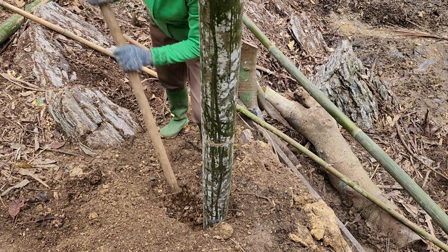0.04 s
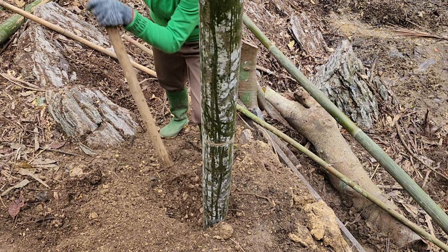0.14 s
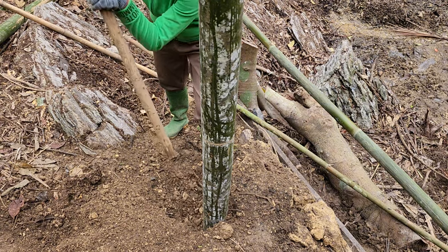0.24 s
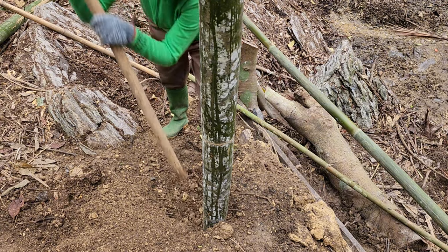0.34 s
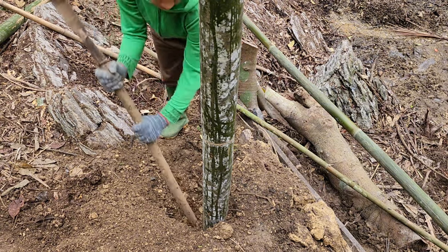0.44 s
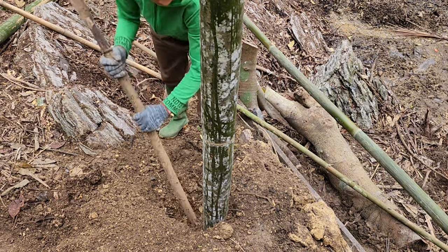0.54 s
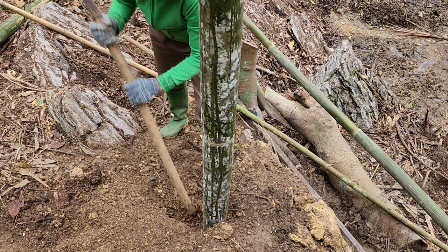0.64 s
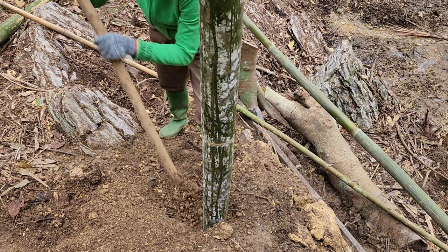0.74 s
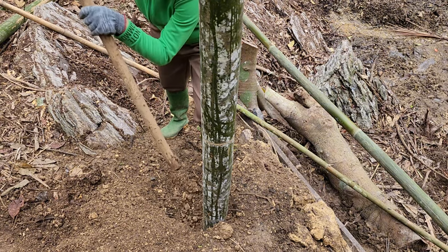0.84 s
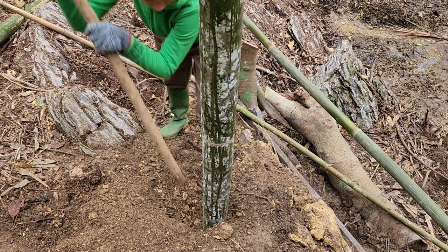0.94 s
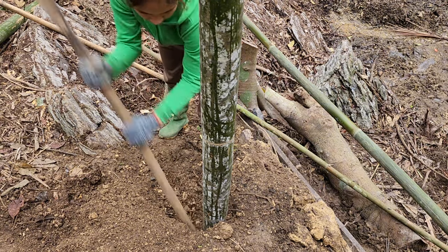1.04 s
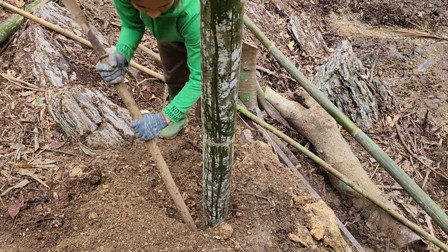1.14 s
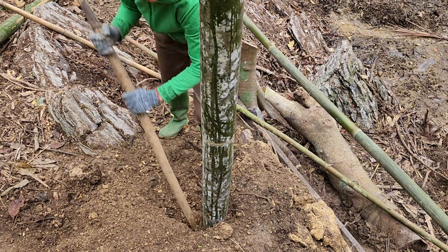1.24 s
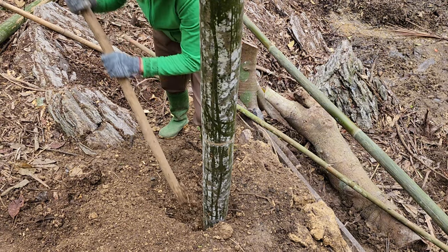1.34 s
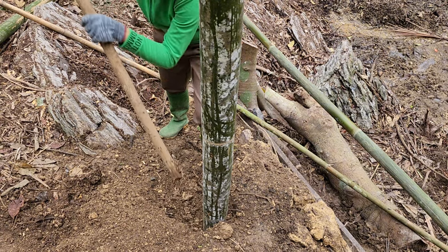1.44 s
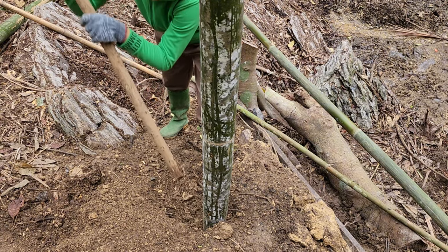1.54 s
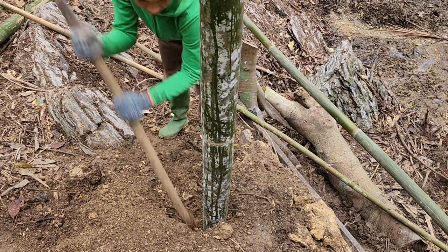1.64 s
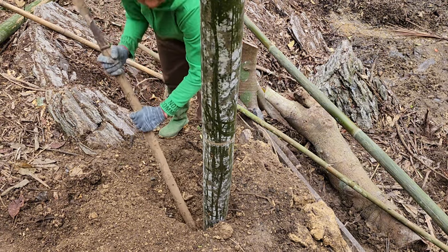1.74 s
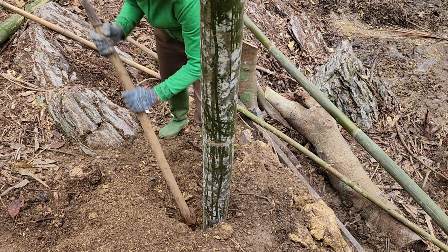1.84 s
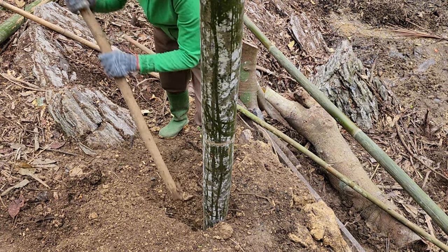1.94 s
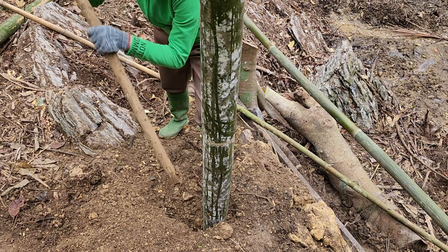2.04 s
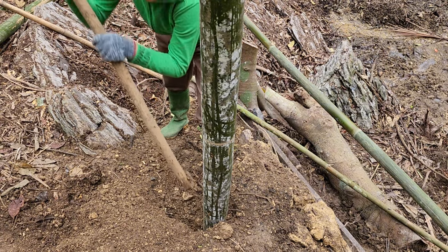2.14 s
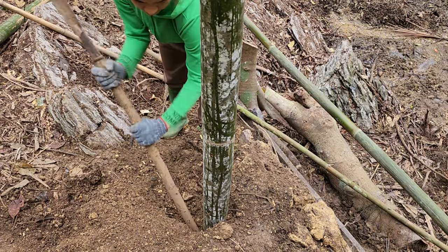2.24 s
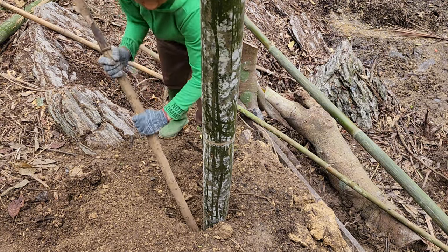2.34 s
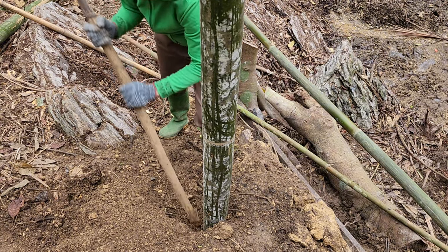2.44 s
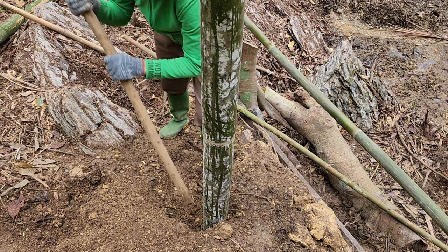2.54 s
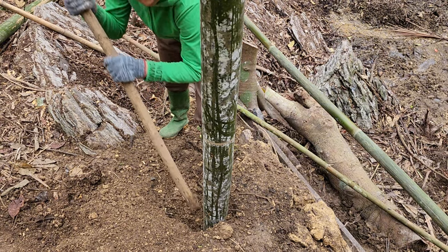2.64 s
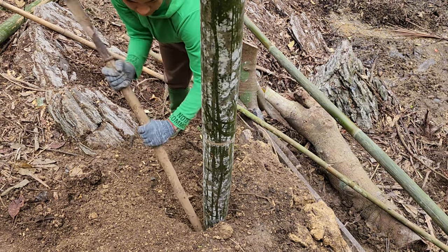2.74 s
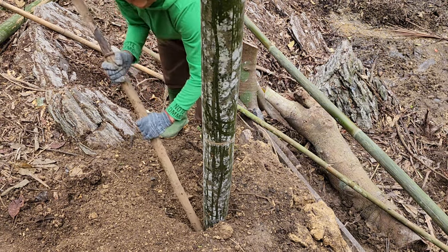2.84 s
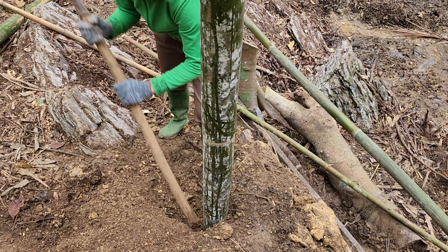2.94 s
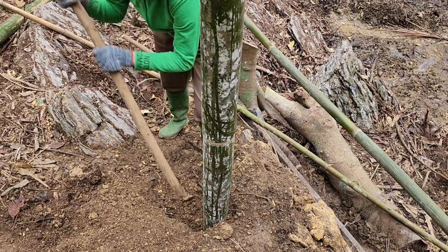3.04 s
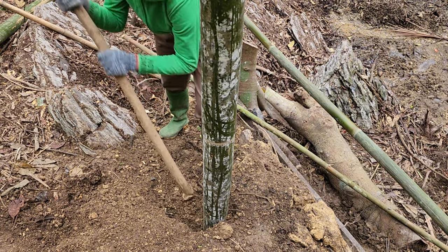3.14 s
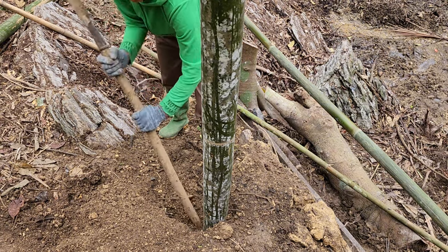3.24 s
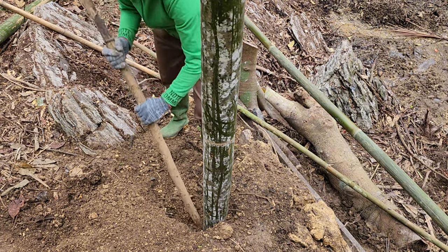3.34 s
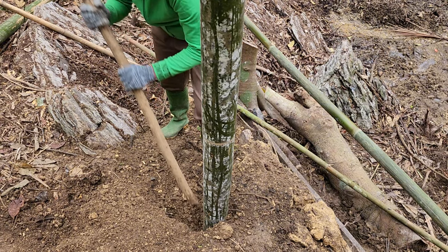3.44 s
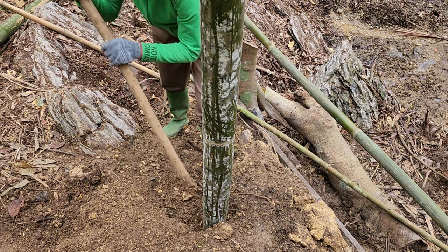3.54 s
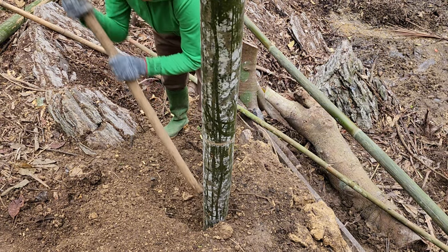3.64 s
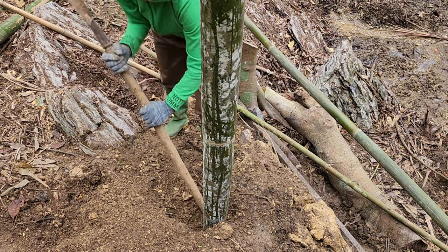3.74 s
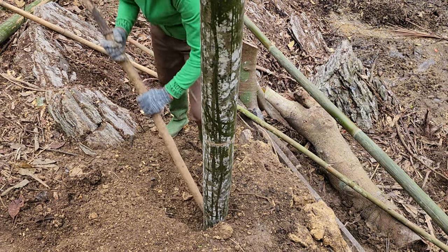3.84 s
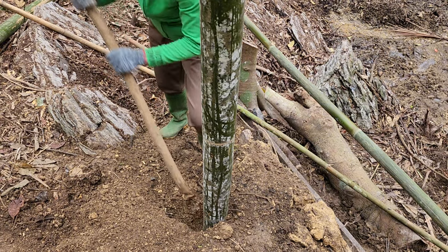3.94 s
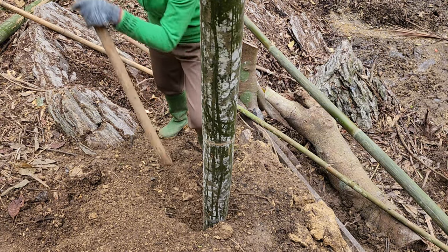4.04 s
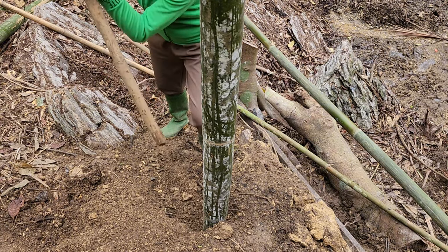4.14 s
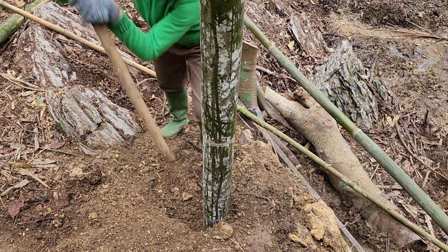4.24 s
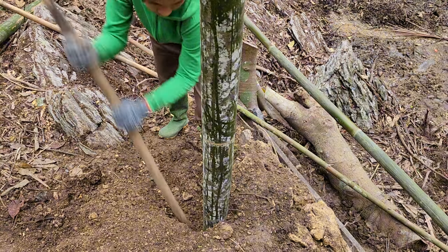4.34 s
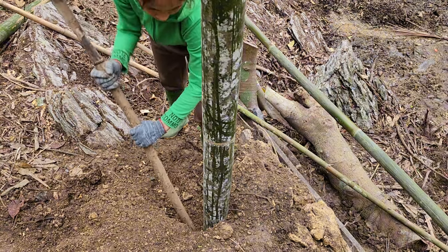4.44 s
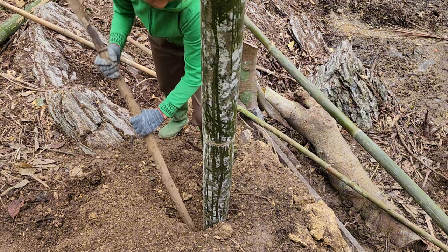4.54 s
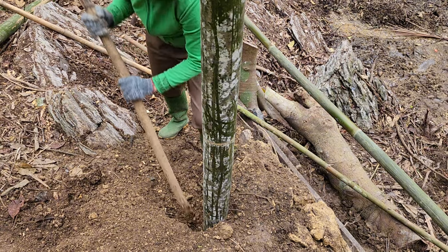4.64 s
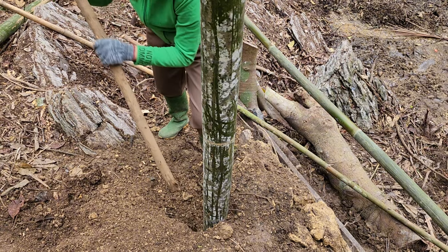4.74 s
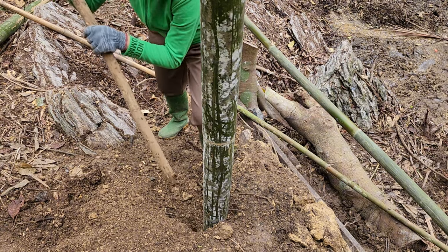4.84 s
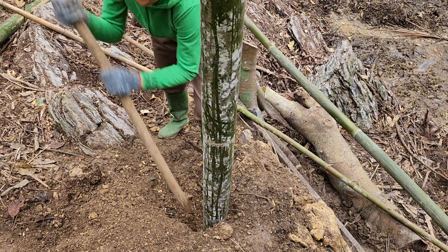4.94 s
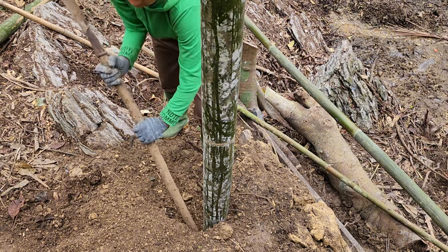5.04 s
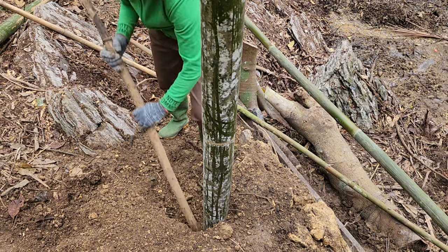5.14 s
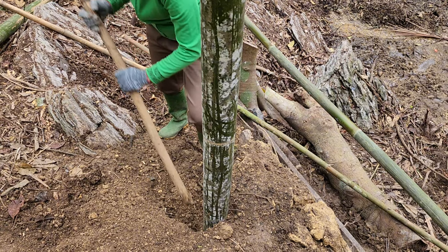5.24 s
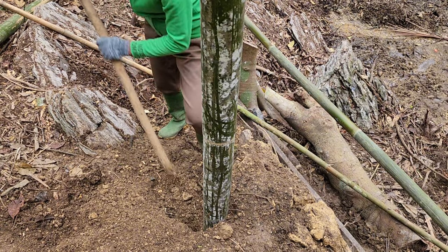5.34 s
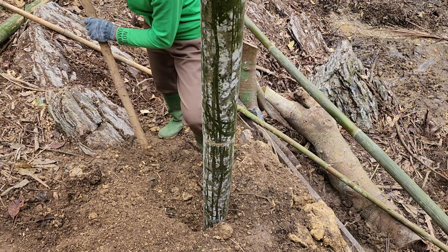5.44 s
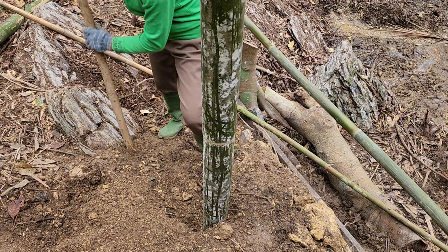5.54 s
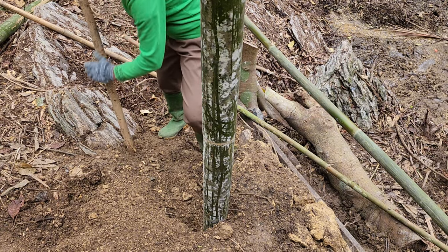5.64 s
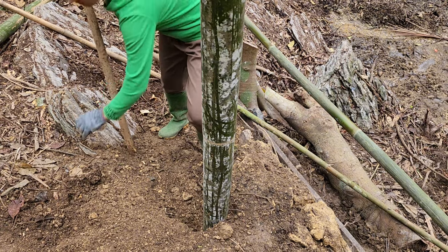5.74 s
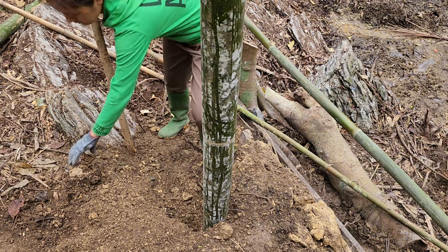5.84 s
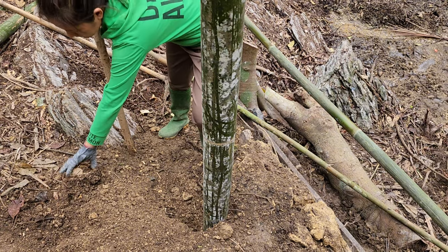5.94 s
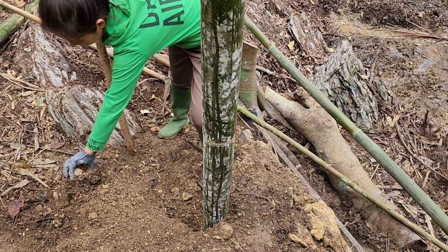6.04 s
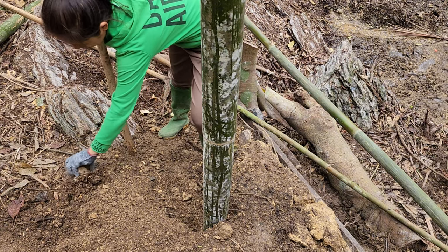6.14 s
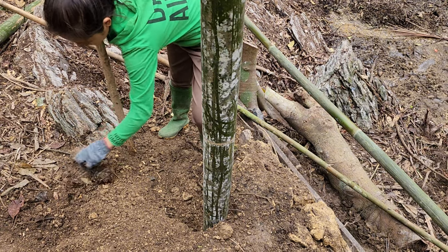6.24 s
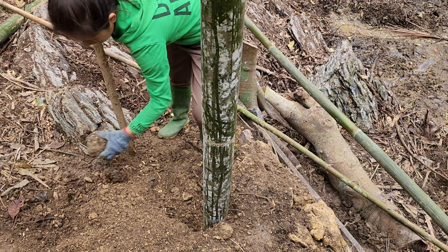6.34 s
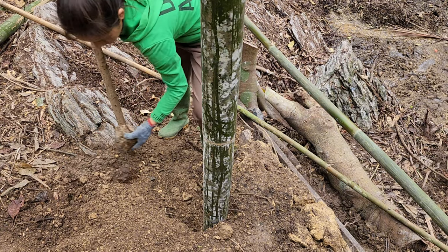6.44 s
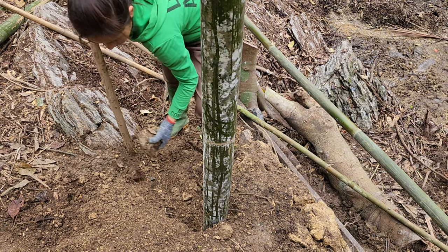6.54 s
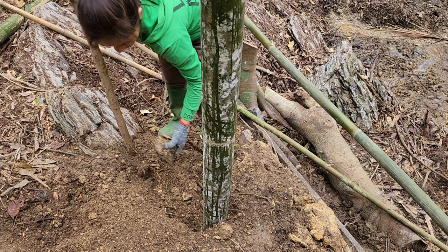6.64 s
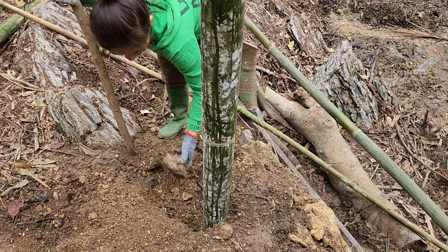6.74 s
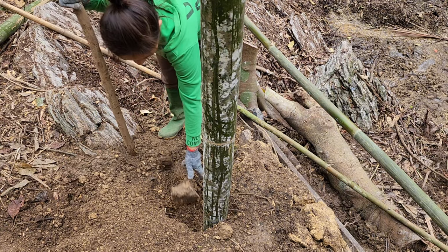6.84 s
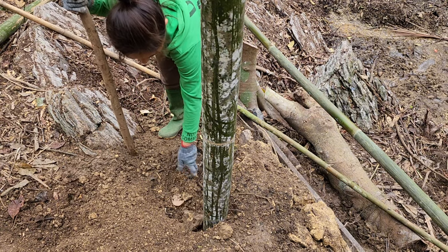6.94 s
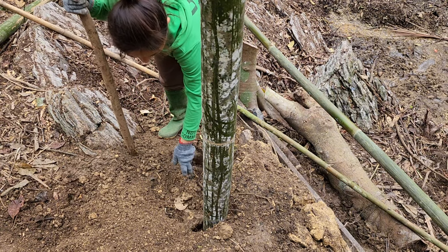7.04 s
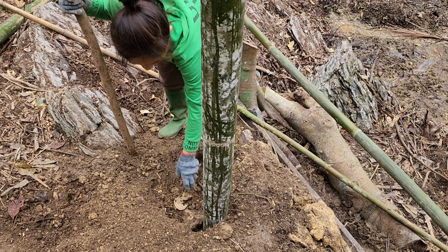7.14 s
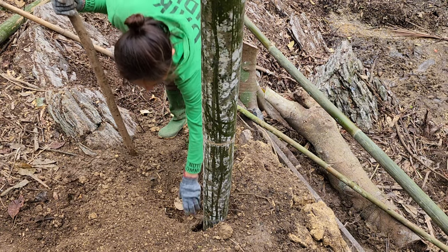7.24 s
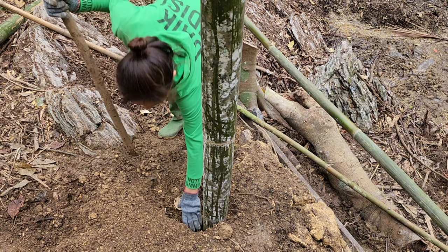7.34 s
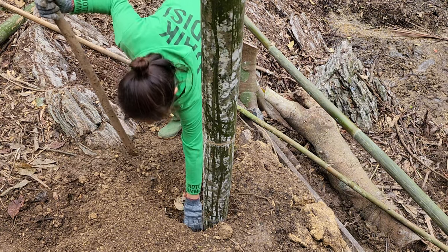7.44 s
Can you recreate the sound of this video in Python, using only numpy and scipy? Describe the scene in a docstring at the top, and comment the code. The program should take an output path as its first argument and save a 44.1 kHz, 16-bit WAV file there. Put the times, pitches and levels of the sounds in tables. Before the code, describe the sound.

A wooden pole is rammed repeatedly into loose soil with close, crunching thuds, while insects chirr faintly outdoors.

```python
"""Crunching, thumping blows close by: a wooden pole is rammed into loose soil beside a post, near a phone.
Later the pole is set down and a stone is dropped. Each blow crushes crumbs of earth, knocks the pole and
thumps the ground, which shudders on; soil trickles as the pole is pulled out.
Insects chirr over a distant outdoor rush."""
import sys
import numpy as np
from scipy import signal
from scipy.fft import rfft, irfft
from scipy.io import wavfile
from scipy.ndimage import uniform_filter1d

SR = 44100
rng = np.random.default_rng(int(sys.argv[2]) if len(sys.argv) > 2 else 0)


def materialize(psi):
    """Save the field psi as 16-bit PCM at rate SR to the path in sys.argv[1].

    A 1-D psi becomes a single channel; in a 2-D psi each row is a channel.
    """
    bounded = np.clip(np.atleast_2d(psi).T, -1, 1)
    quanta = np.round(bounded * 32767).astype(np.int16)
    wavfile.write(sys.argv[1], SR, quanta)


N = 330750

# modes of the wooden pole: f/Hz, gain/dB, t60/s
POLE_MODES = [(181, -37.5, 0.051), (290.6, -2.5, 0.11), (423.5, -3, 0.061), (637, -14.5, 0.11),
              (730, 5.5, 0.026), (868, 1, 0.025), (1104, -9, 0.016), (1290, -7, .03), (2300, -8, 0.028),
              (2600, -10, 0.035), (3130, -12, 0.014), (3680, 3, .025)]


def undb(db):
    """dB to gain."""
    return 10 ** (np.asarray(db) / 20)


def unit(x):
    """Scale to rms 1."""
    return x / np.sqrt(np.mean(x ** 2))


def band(x, hz, *widths_hz):
    """Two-pole band-passes in series, one per width; gain 1 at the centre."""
    for width_hz in widths_hz:
        x = signal.lfilter(*signal.iirpeak(hz, hz / width_hz, SR), x)
    return x


def walk(rate_hz):
    """Random levels, each held one period, smoothed twice."""
    hold = int(SR / rate_hz)
    steps = np.repeat(rng.standard_normal(N // hold + 1), hold)
    return uniform_filter1d(uniform_filter1d(steps, hold), hold)[:N]


def add(out, start_s, sound):
    """Mix sound into out at start_s."""
    i = int(start_s * SR)
    out[..., i:i + sound.shape[-1]] += sound[..., :N - i]


def clicks(size, scatter_db):
    """Dense clicks, a few much larger than the rest."""
    return unit(rng.standard_normal(size) * undb(scatter_db * np.minimum(rng.exponential(size=size), 5)))


def ports(right, left, lag_samples=6):
    """The ports face different ways: the left hears the hole first, with upper middle and top shaded."""
    shaded = (left - 0.58 * band(left, 2050, 2800) - 0.3 * band(left, 4500, 2100)
              - 0.8 * band(left, 9500, 4000))
    return np.array([shaded, np.r_[np.zeros(lag_samples), right[:-lag_samples]]])


def rush():
    """Distant leaves and air: coloured noise, bands flickering apart; only the bass is alike in stereo."""
    spectrum = [(15, -15), (25, -0.5), (129, -6), (227, -15), (281, -7.5), (480, -13), (684, -7.5),
                (1410, -2), (3200, -8.5), (4700, -14.5), (6900, -12), (7500, -23), (8400, -49),
                (10000, -36.5), (11500, -30.5), (15500, -32.5)]  # noise colour: f/Hz, relative density/dB
    balance = [(60, -6), (110, 6.5), (200, 1.5), (380, 10), (700, 4), (1290, 5), (2380, -3.5), (4400, 0),
               (8120, -11), (15000, 3)]  # stereo tilt: f/Hz, left minus right/dB
    envelope = [(0.0, -49), (1.36, -49.5), (3.11, -53), (3.4, -51.5), (5.051, -50), (5.219, -52),
                (6.23, -49.5), (6.869, -50.5), (7.04, -53.5), (7.5, -50)]  # slow drift: t/s, level/dB
    edges_hz = [0, 150, 400, 1000, 2000, 4000, 8000, SR]
    flicker_db = [3.5, 1.2, 1.2, 0.9, 1.9, 0.23, 1.5]
    f = np.maximum(np.arange(N // 2 + 1) * SR / N, 1)

    def curve_db(table):
        hz, db = np.transpose(table)
        return np.interp(np.log(f), np.log(hz), db)

    coherence = np.clip(45 / f, 0, 0.6)
    mid, side = rfft(rng.standard_normal((2, N)))
    pair = np.sqrt(1 + coherence) * mid + np.sqrt(1 - coherence) * side * np.array([[1], [-1]])
    pair *= undb(curve_db(spectrum) + np.array([[0.5], [-0.5]]) * curve_db(balance))
    pair /= np.sqrt(np.mean(irfft(pair, N) ** 2))
    out = sum(undb(db * walk(rate_hz=18)) * irfft(pair * ((f >= lo) & (f < hi)), N)
              for lo, hi, db in zip(edges_hz, edges_hz[1:], flicker_db))
    return out * undb(np.interp(np.arange(N) / SR, *np.transpose(envelope)))


def insects():
    """Fast wing clicks, smeared by distance, ring two pitches: a throbbing singer under a higher chorus."""
    levels = [(0.0, -61, -56), (1.57, -59.5, -56), (1.75, -63, -57.5), (3.01, -62.5, -58.5),
              (3.45, -78, -58), (3.612, -62, -55.5), (4.78, -60, -56), (5.16, -61.5, -66), (5.89, -58, -64),
              (7.23, -63, -65.5), (7.5, -57.5, -64)]  # chirring before panning: t/s, singer/dB, chorus/dB
    throb_period_s, throb_peak_s = 0.2635, 0.18
    times_s, singer_db, chorus_db = np.transpose(levels)
    t = np.arange(N) / SR
    throb = undb(4.5 * np.cos(2 * np.pi * (t - throb_peak_s) / throb_period_s) + 3.4 * walk(rate_hz=53))
    singer = band(clicks((2, N), scatter_db=1.34), 5430, 350)
    singer = unit(band(band(singer, 5400, 650), 5450, 590)) * throb
    chorus = band(clicks((2, N), scatter_db=3.4), 6300, 630, 1300)
    chorus = unit(band(chorus, 5400, 770)) * undb(2.5 * walk(rate_hz=30))
    both = singer * undb(np.interp(t, times_s, singer_db)) + chorus * undb(np.interp(t, times_s, chorus_db))
    return both * undb([[-1.5], [3]])  # toward the right


def ground():
    """Low tones swell, sag in pitch and die, roughened by the rumble of shifting earth."""
    thuds = [(.447, -14.5, 124.6, 0.073), (1.056, -14.5, 100.4, 0.13), (1.672, -8, 118.8, 0.1),
             (2.251, -13.5, 87.6, .15), (2.302, -21, 76.4, 0.065), (2.768, -21, 136, 0.084),
             (3.227, -32.5, 150, 0.21), (3.723, -28, 109.4, 0.2), (4.370, -3.5, 115.7, 0.071),
             (4.406, -21.5, 87, 0.081), (5.022, -13, 105, .096), (5.543, -21, 138, 0.12),
             (5.552, -13.5, 244.4, 0.008), (6.938, -19.5, 158.8, .17)]  # dull pushes into the ground: t/s, level/dB, f/Hz, t60/s
    shudders = [(.436, -11.5, 68, .08), (.48, -24.5, 58.6, 0.17), (1.048, -17.5, 61, 0.13),
                (1.112, -26.5, 48, 0.24), (1.735, -31, 48.6, 0.26), (2.346, -40.5, 49.3, 0.23),
                (2.785, -33, 59, 0.13), (2.844, -44, 50, .12), (3.274, -35, 59.7, 0.13),
                (3.731, -27, 55, 0.17), (4.445, -33, 47.3, 0.33), (5.055, -21.5, 49, 0.097),
                (5.11, -33, 46.4, 0.29), (5.548, -30.5, 78, 0.12), (5.788, -39.5, 70, 0.09),
                (6.058, -51, 69.5, 0.14), (6.937, -33, 60.8, .3), (7.009, -43, 60.7, 0.11),
                (7.198, -48.5, 50, .13), (7.467, -51, 59.8, .06)]  # lower shudders that follow: t/s, level/dB, f/Hz, t60/s
    thud_swell_s, shudder_swell_s, sag_s = 0.011, 0.022, 0.045
    out, t = np.zeros((2, N)), np.arange(SR // 2) / SR
    for events, swell_s in ((thuds, thud_swell_s), (shudders, shudder_swell_s)):
        for start_s, db, hz, t60_s in events:
            swell = np.sin(np.pi / 2 * np.minimum(t / swell_s, 1)) ** 2
            decay = undb(-60 * np.maximum(t - swell_s, 0) / t60_s)
            tone = -np.sin(2 * np.pi * hz * (t + 0.0007 * (1 - np.exp(-t / sag_s))))
            mid, side = unit(band(rng.standard_normal((2, len(t))), hz, 0.72 * hz, 0.72 * hz))
            rumble = 0.62 * mid + 0.17 * side * np.array([[1], [-1]])
            add(out, start_s, undb(db) * swell * decay * (tone + rumble))
    return out


def pole_ring(force):
    """The pole's decaying modes, driven by force."""
    out = 0
    for hz, db, t60_s in POLE_MODES:
        step = np.exp(2j * np.pi * hz / SR - np.log(1000) / (t60_s * SR))
        out = out + undb(db) * signal.lfilter([1], [1, -step], force).imag
    return out


def knocks():
    """Hard contact: a tick, a sharp crack that rings a few cycles, and a short push that rings the pole."""
    hits = [(1.047, -1.5, 2200, -16.5), (1.072, -5, 890, -14), (1.4168, -19, 1340, -32.5),
            (1.661, -19, 2500, -54), (1.675, -18, 2000, -20.5), (1.687, -23, 1000, -15),
            (2.2426, -2, 850, -5.5), (2.255, -22, 2500, -4.5), (2.737, -33, 2480, -42),
            (2.743, 3.5, 2330, -35), (2.753, -19, 1490, -21.5), (2.871, -23, 1330, -48),
            (3.2253, 0, 1130, 0), (3.463, -42.5, 2950, -80), (3.7047, -6.5, 2390, -47),
            (3.72, -17, 1120, -28), (3.727, -12.5, 895, -23), (4.368, -27, 2800, -28),
            (4.578, -22, 2980, -66), (4.61, -32, 695, -48), (5.007, -25, 2800, -38),
            (5.016, -0.5, 1470, -22), (6.933, 0, 1460, -2.5), (6.944, -20, 2000, -35)]  # knocks on stone or wood: t/s, crack level/dB, crack f/Hz, pole drive/dB
    cracks, force = np.zeros(N), np.zeros(N)
    t = np.arange(400) / SR
    tick = np.exp(-t / 0.00015) * np.sin(2 * np.pi * 4200 * t)
    for start_s, crack_db, hz, pole_db in hits:
        crack = np.exp(-t * hz / 1.9) * np.sin(2 * np.pi * hz * t)
        add(cracks, start_s, -undb(crack_db) * (crack + 0.35 * tick))
        add(force, start_s, undb(pole_db) * np.hanning(40) / 50)
    sound = cracks + pole_ring(force)
    return ports(sound, sound)


def crunch(t, db, treble_db, pole_db, *, rise_s, hold_s, t60_s, hz, q, entry_db=0):
    """Sound and pole force of crumbs breaking at t = 0; hz and q are pairs: (on entry, dug in)."""
    # bright treble of the crunch, with the microphone's peak near 11.5 kHz: f/Hz, width/Hz, gain/dB
    treble_bands = [(3980, 2600, -2), (6840, 1200, 4), (11570, 1600, 7), (13600, 6000, -3.5)]
    bite_s, spray_db, spray_t60_s = 0.0015, -30.5, 0.28
    attack_db = entry_db * np.clip(-t / bite_s, 0, 1) + 30 * np.minimum(t, 0) / rise_s
    envelope = undb(db + attack_db - 60 * np.maximum(t - hold_s, 0) / t60_s)
    crumbs = clicks((2, len(t)), scatter_db=3.2)
    treble = unit(sum(undb(gain_db) * band(crumbs, f, width, width) for f, width, gain_db in treble_bands))
    entry, dug = (unit(band(crumbs, f, f / sharpness, 1.07 * f / np.sqrt(sharpness)))
                  for f, sharpness in zip(hz, q))
    depth = np.clip((t + 0.18 * rise_s) / (0.22 * rise_s + 0.41 * hold_s), 0, 1)
    body = np.sqrt(1 - depth) * entry + np.sqrt(depth) * dug
    top = undb(treble_db - 1.7 * (2.5 - depth)) * treble
    # fine sand keeps falling afterwards
    spray = undb(db + treble_db + spray_db - 60 * t / spray_t60_s) * np.clip(t / hold_s, 0, 1) * treble
    force = envelope * undb(pole_db) * rng.standard_normal((2, len(t)))
    return np.array([envelope * (body + top) + spray, force])


def soil():
    """Blows, scrapes and clods crush crumbs of earth; the same shaking rings the pole."""
    # nine strokes, the pole set down, the stone:
    # t/s, level/dB, entry offset/dB, hold/s, entry f/Hz, dug-in f/Hz, treble/dB, pole drive/dB
    blows = [(0.441, -13, -5, 0.011, 2830, 2070, -15.5, -33),
             (1.046, -13, -8, 0.023, 2870, 1690, -15.5, -34),
             (1.672, -10.5, -6.5, 0.011, 2320, 1910, -18, -35),
             (2.244, -11, -10.5, 0.018, 1220, 1740, -20.5, -34),
             (2.736, -18, -0.5, 0.029, 2670, 1650, -20.5, -37),
             (3.219, -16.5, 2.5, 0.018, 1380, 1073, -23, -33.5),
             (3.706, -20, -9, 0.027, 2470, 1900, -12, -33), (4.37, -12, -7, 0.016, 2760, 2130, -17, -36.5),
             (5.009, -9.5, -4, 0.0078, 2690, 1940, -15, -35),
             (5.55, -34, -1, 0.016, 2740, 1890, -16.5, -28), (6.925, -21, 1, 0.019, 1270, 1630, -23, -31)]
    # soil trickling as the pole is pulled out or a hand rakes it:
    # t/s, level/dB, 30 dB rise/s, f/Hz, treble/dB, pole drive/dB
    scrapes = [(0.202, -62, 0.08, 4000, 0, -22), (.58, -45, 0.17, 2230, -41, -44.5),
               (1.193, -40, 0.12, 2400, -26, -38.5), (1.757, -43.5, 0.086, 2440, -32, -41),
               (2.301, -41, 0.015, 1930, -22, -31.5), (2.378, -50, 0.18, 2280, -16, -34),
               (2.867, -39, 0.13, 1740, -50, -31.5), (3.35, -50.5, 0.28, 1690, -42, -24.5),
               (3.82, -43.5, .11, 2080, -23.5, -37.5), (4.574, -43.5, 0.39, 2400, -20.5, -49),
               (5.132, -45, 0.19, 2560, -17, -57), (5.608, -55, .075, 4000, 5, -44.5),
               (6.092, -67, 0.22, 1000, -32, -17.5), (6.182, -47, 0.12, 3370, -10, -39.5),
               (6.5, -58.5, .02, 3950, -15, -65), (7.023, -56, 0.024, 2970, -8, -47)]
    # clods and pebbles cracking or landing: t/s, level/dB, t60/s, f/Hz, Q, pole drive/dB
    clods = [(1.085, -30, .1, 830, 27, -33), (1.254, -43, .11, 820, 2, -28),
             (1.418, -32.5, 0.071, 1480, 1.6, -38), (3.461, -38, 0.053, 1800, 0.51, -46),
             (4.472, -48.5, .1, 850, 2.5, -29), (4.610, -51, 0.061, 740, 0.67, -18),
             (5.086, -42, 0.043, 2600, 7.4, -31), (7.113, -54.5, 0.054, 543, 4, -40)]
    lead_s = 0.2
    t = np.arange(SR // 2) / SR - lead_s
    tracks = np.zeros((2, 2, N))
    for at_s, db, entry_db, hold_s, entry_hz, dug_hz, treble_db, pole_db in blows:
        blow = crunch(t, db, treble_db, pole_db, rise_s=0.025, hold_s=hold_s, t60_s=0.076,
                      hz=(entry_hz, dug_hz), q=(2.16, 1.024), entry_db=entry_db)
        add(tracks, at_s - lead_s, blow)
    for at_s, db, rise_s, hz, treble_db, pole_db in scrapes:
        scrape = crunch(t, db, treble_db, pole_db, rise_s=rise_s, hold_s=0.018, t60_s=0.1,
                        hz=(hz, 0.88 * hz), q=(1.4, 1.4))
        add(tracks, at_s - lead_s, scrape)
    for at_s, db, t60_s, hz, q, pole_db in clods:
        clod = crunch(t, db, treble_db=-39, pole_db=pole_db, rise_s=0.0091, hold_s=0.0037, t60_s=t60_s,
                      hz=(hz, hz), q=(q, q))
        add(tracks, at_s - lead_s, clod)
    grit, force = tracks
    pole = pole_ring(force)
    # crumbs break all round the hole, so the ports agree less at high frequencies
    shared = signal.sosfilt(signal.butter(1, 4000, fs=SR, output="sos"), grit[0])
    apart = signal.sosfilt(signal.butter(1, 1300, "high", fs=SR, output="sos"), grit[1])
    return ports(right=grit[0] + pole[0], left=0.56 * shared + 1.1 * apart + 0.93 * pole[0] + 0.5 * pole[1])


def scene():
    """All sources at the two microphone ports."""
    return soil() + knocks() + ground() + rush() + insects()


def record(dry):
    """The microphone dips near 9 kHz; the phone clips the loudest peaks and cuts the top."""
    cutoff_hz = 15750
    dipped = dry - 0.64 * band(dry, 8740, 4100)
    lowpass = signal.ellip(16, 0.2, 90, cutoff_hz, fs=SR, output="sos")
    return signal.sosfilt(lowpass, np.clip(dipped, -1, 1))


dry = scene()
out = record(dry)
materialize(out)
```